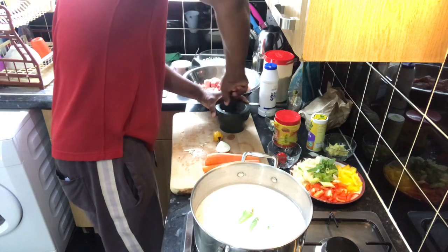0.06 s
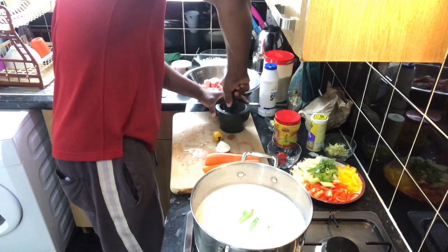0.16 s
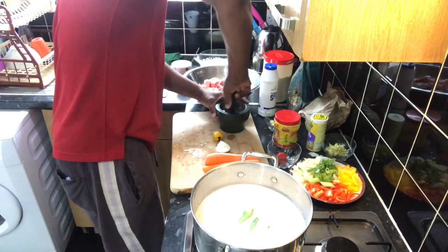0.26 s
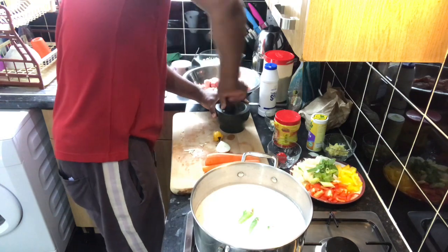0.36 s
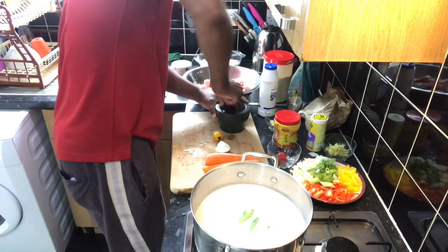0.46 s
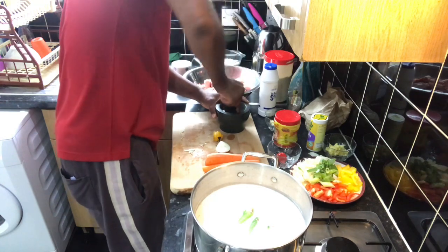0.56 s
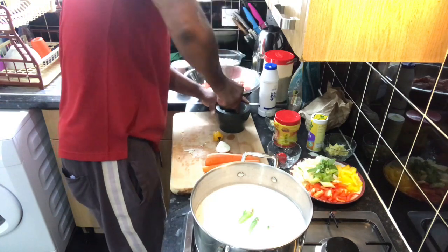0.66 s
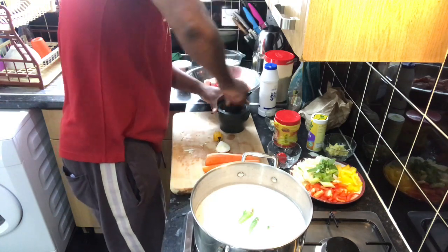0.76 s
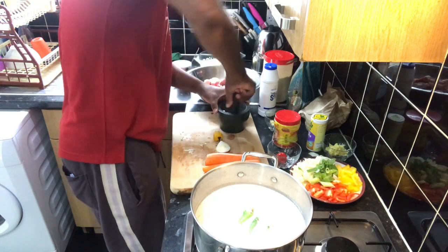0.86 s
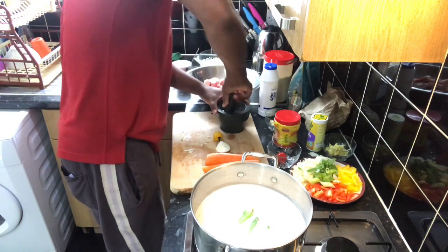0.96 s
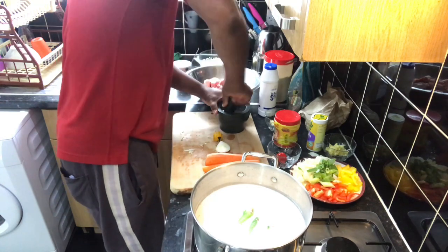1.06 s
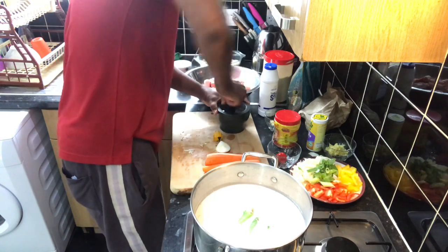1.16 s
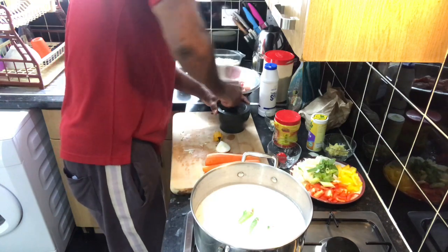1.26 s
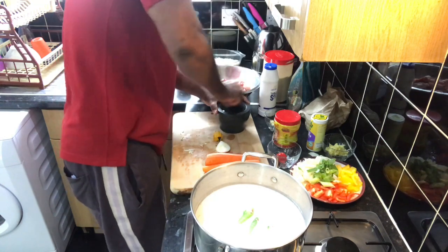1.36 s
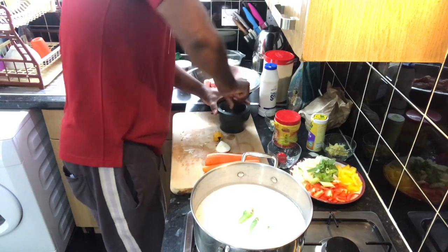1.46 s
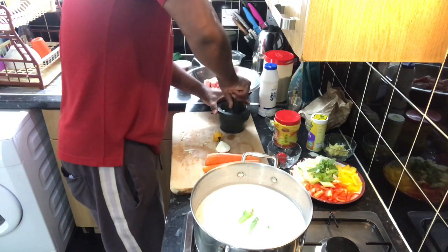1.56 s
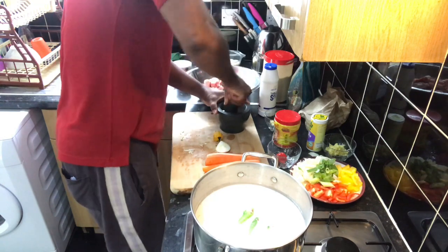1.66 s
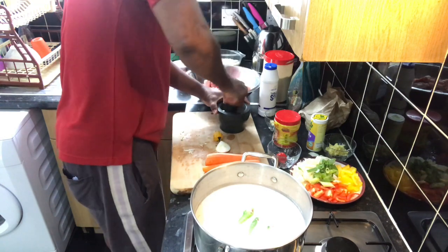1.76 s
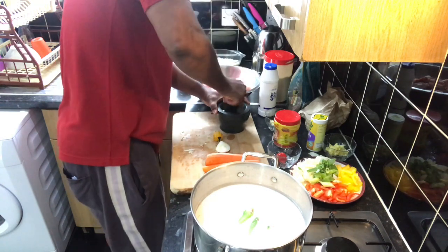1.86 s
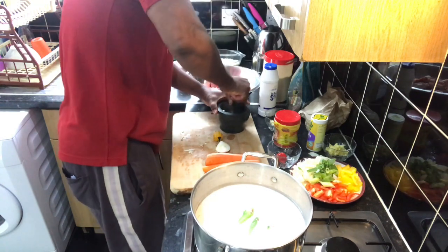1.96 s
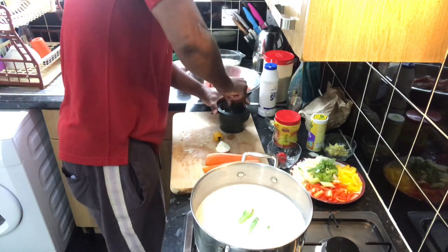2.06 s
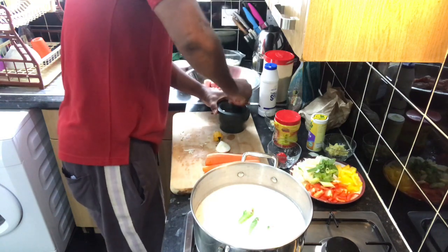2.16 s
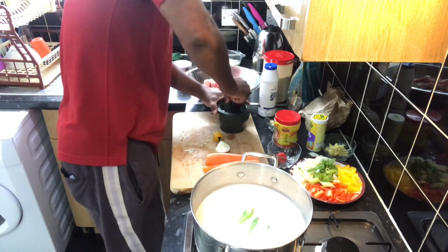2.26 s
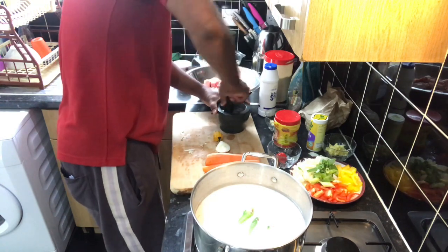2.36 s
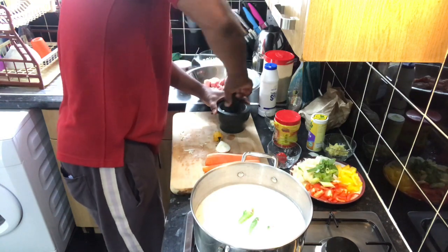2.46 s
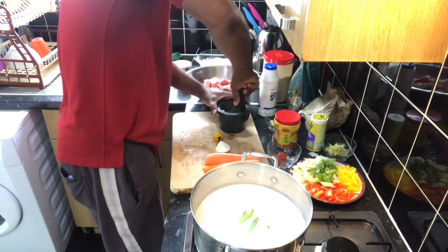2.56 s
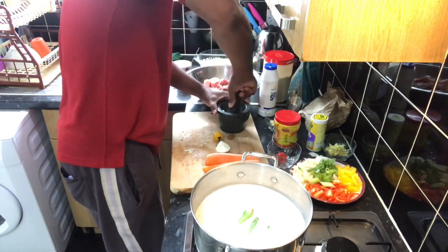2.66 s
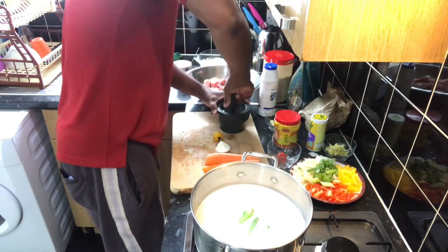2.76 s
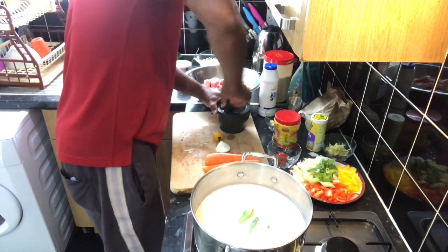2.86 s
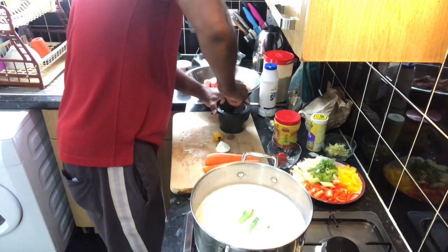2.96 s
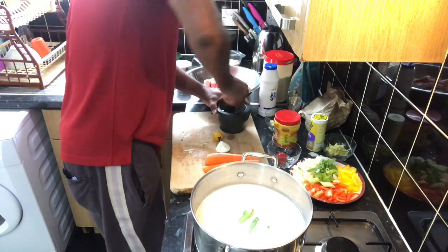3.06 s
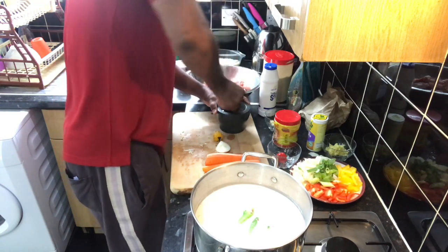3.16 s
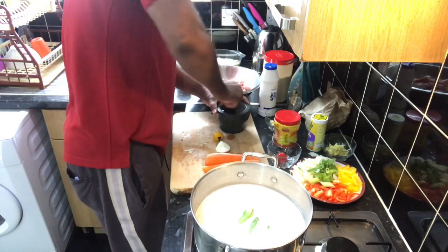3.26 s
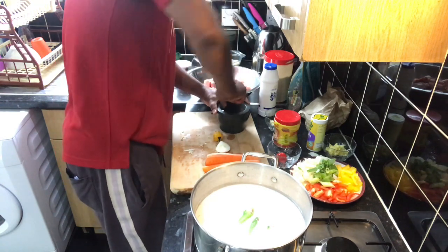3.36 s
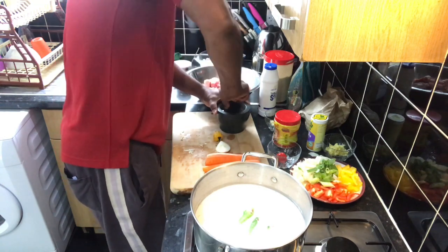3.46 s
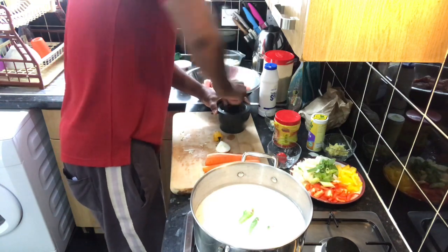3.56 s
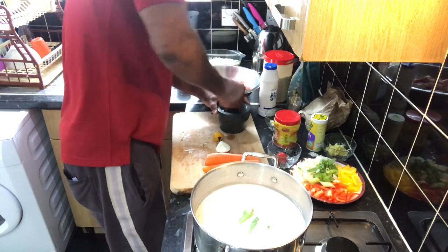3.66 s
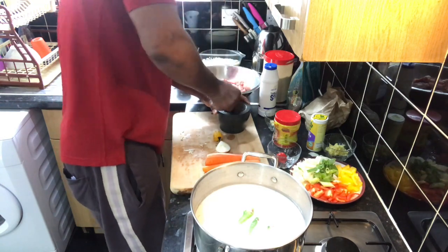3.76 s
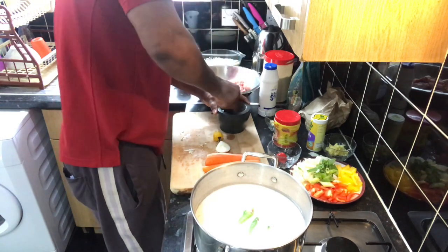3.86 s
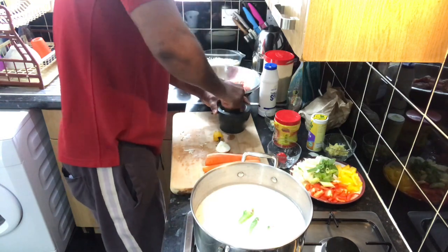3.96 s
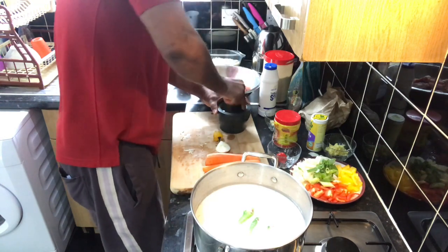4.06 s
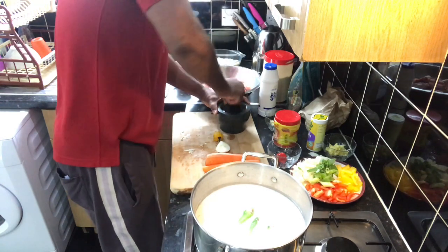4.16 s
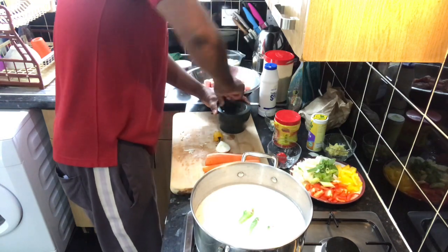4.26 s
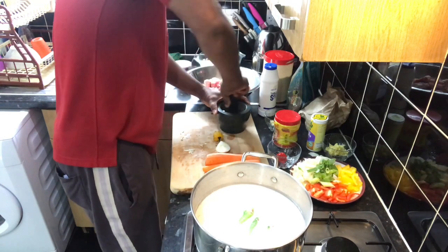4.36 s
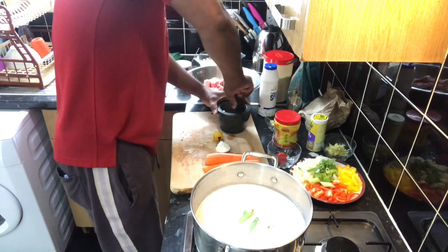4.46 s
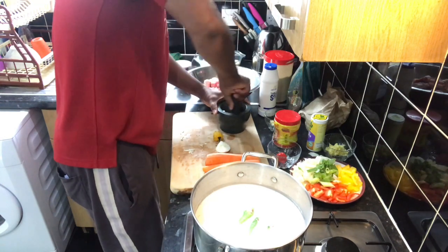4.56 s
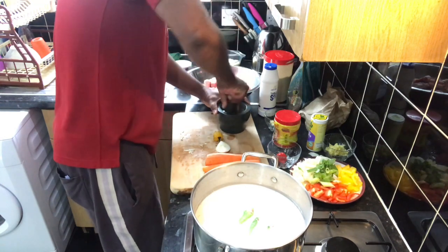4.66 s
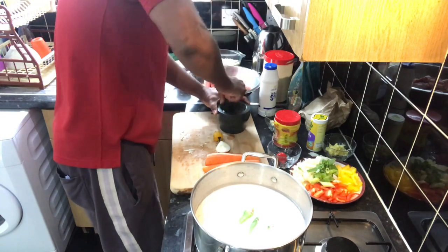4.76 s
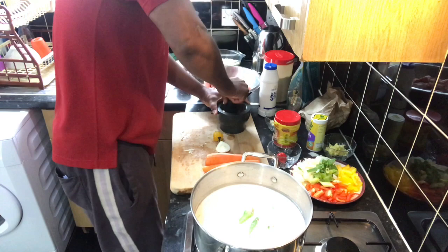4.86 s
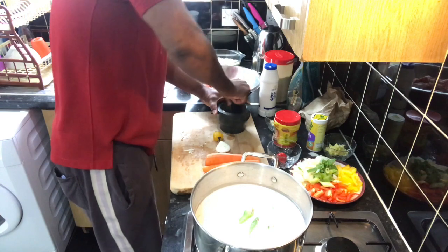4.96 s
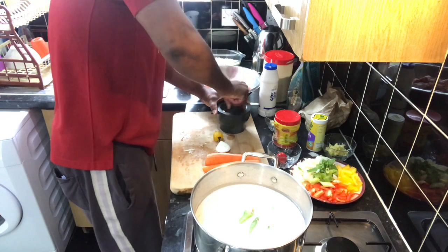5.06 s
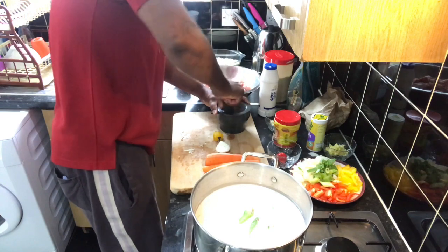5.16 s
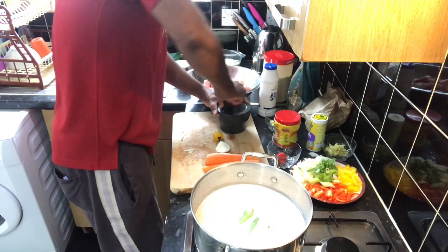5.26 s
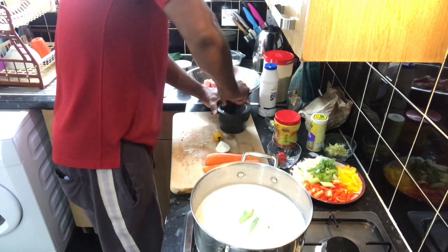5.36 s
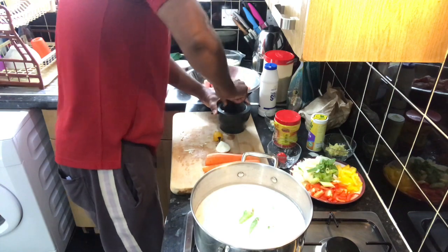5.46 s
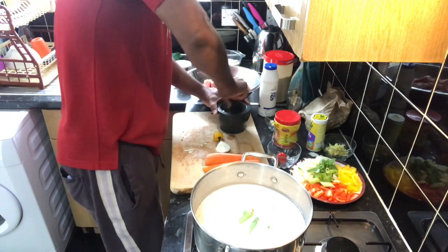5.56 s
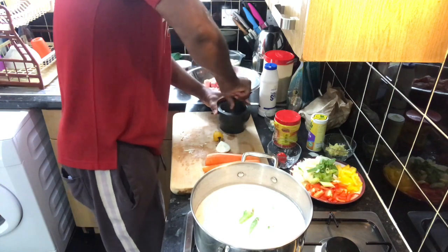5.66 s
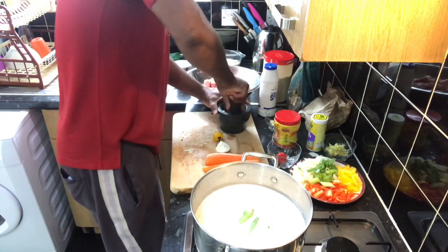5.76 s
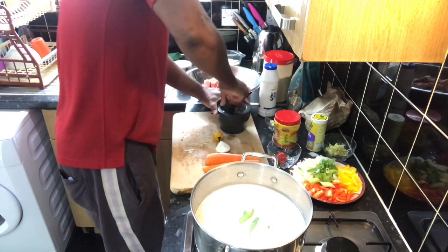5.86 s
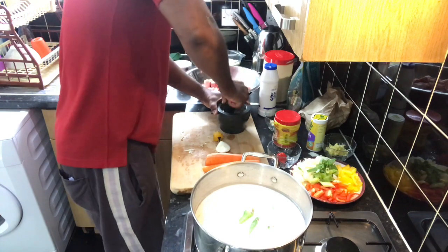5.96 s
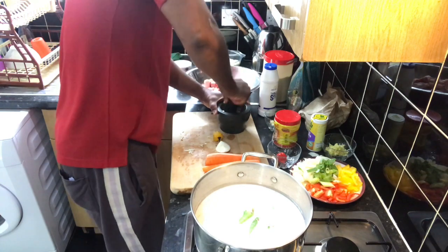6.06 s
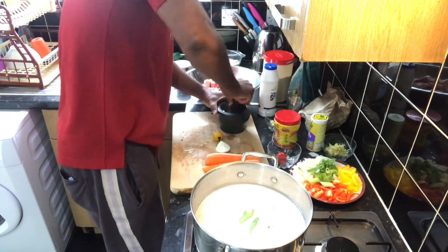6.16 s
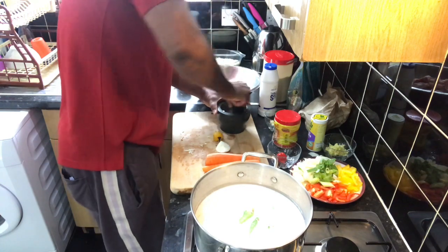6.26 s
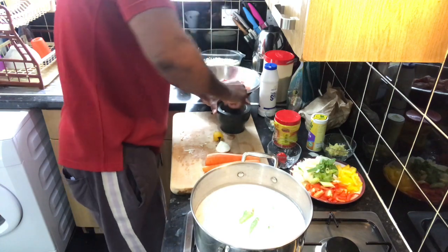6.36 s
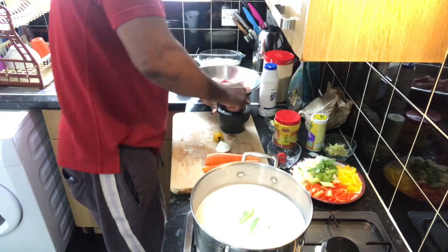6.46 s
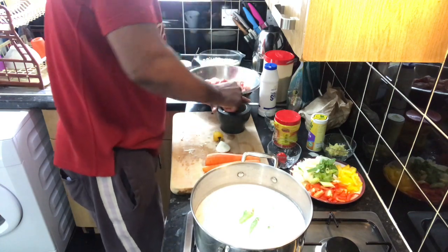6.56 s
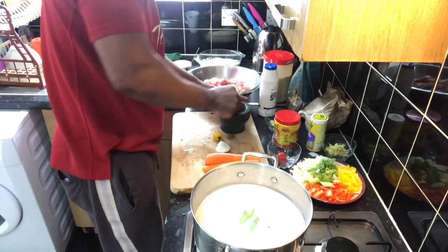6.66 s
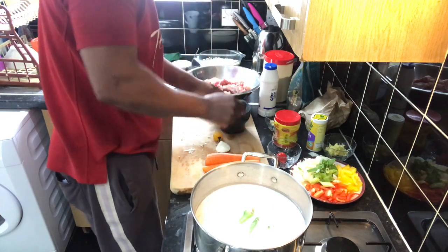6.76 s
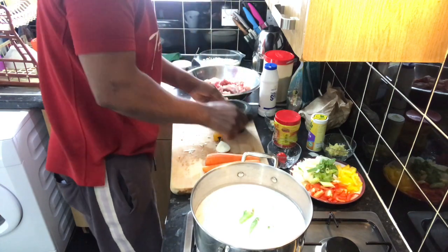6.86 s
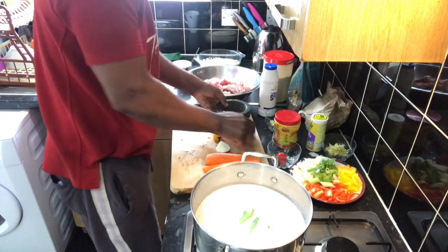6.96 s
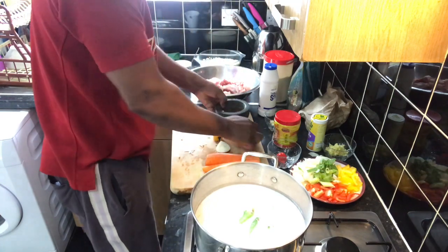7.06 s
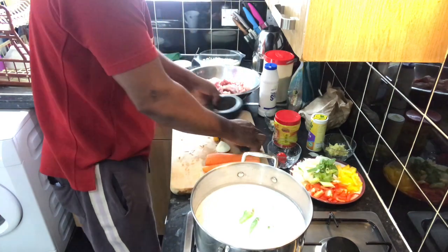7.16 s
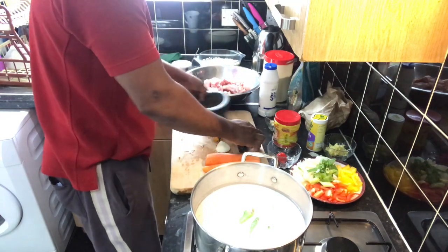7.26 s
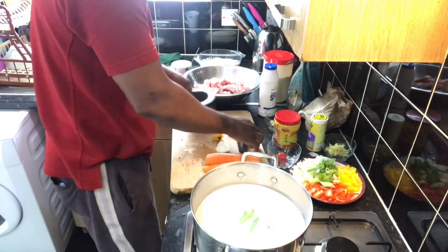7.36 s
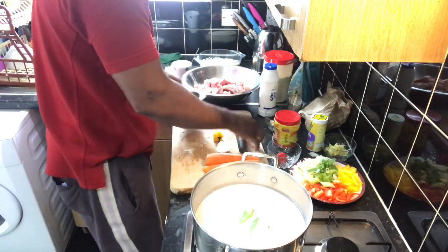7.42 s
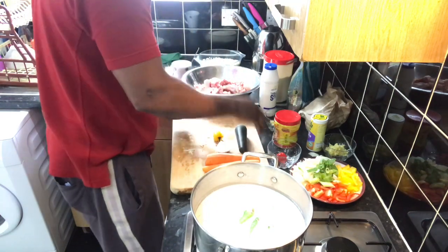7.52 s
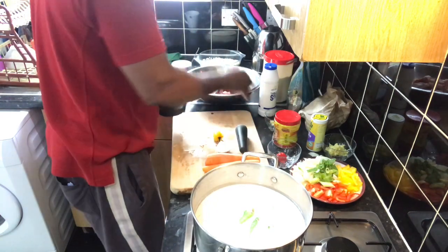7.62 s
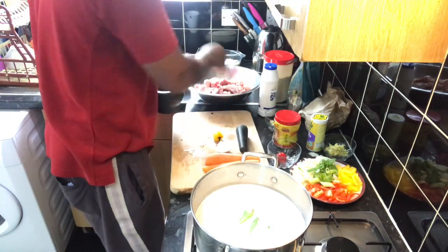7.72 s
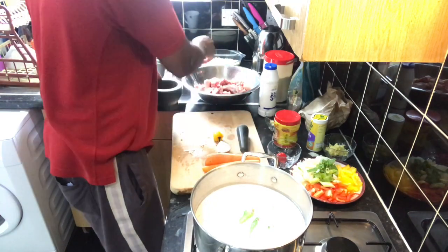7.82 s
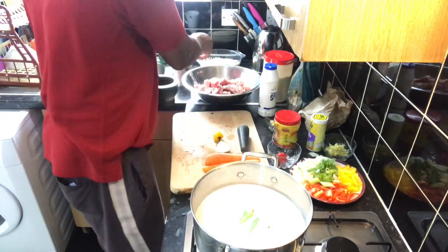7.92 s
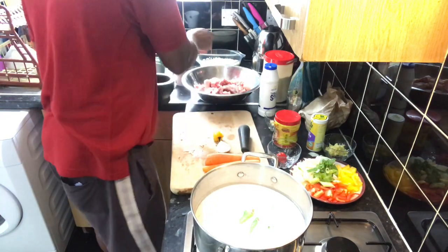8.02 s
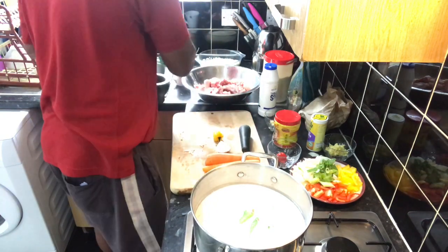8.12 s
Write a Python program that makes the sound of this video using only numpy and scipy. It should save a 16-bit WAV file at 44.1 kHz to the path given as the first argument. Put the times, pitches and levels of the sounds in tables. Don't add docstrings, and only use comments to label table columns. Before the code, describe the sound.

Close, irregular stony knocks and gritty scraping of a mortar and pestle on a board, ending with two woody clacks in a quiet kitchen.

```python
import sys
import numpy as np
from scipy import signal
from scipy.fft import rfft, irfft
from scipy.io import wavfile
from scipy.ndimage import uniform_filter1d

SR = 44100
rng = np.random.default_rng(int(sys.argv[2]) if len(sys.argv) > 2 else 0)


def bounce(signal):
    frames = np.transpose(np.atleast_2d(signal))
    limited = np.clip(frames, -1, 1)
    pcm = np.round(limited * 32767).astype(np.int16)
    wavfile.write(sys.argv[1], SR, pcm)


def volts(x):
    e = np.asarray(x, float) / 20
    return 10 ** e


N = 361179


def in_time(rows):
    s, *columns = np.transpose(rows)
    return [np.interp(np.arange(N) / SR, s, column) for column in columns]


def at_hz(points, hz):
    table_hz, values = np.transpose(points)
    return np.interp(np.log(hz), np.log(table_hz), values)


def rms_one(x):
    return x / np.sqrt(np.mean(x ** 2) + 1e-20)


def coloured(x, spectrum):
    hz = np.arange(len(x) // 2 + 1) * SR / len(x) + 1e-3
    inside = (hz > spectrum[0][0]) & (hz < spectrum[-1][0])
    return irfft(rfft(x) * volts(at_hz(spectrum, hz)) * inside, len(x))


def evened(x, width_hz):
    spectrum = rfft(x)
    smooth = uniform_filter1d(np.abs(spectrum) ** 2, max(round(width_hz * len(x) / SR), 1))
    return irfft(spectrum / np.sqrt(smooth + 1e-12), len(x))


def steadied(x, span_s):
    return rms_one(x / np.sqrt(uniform_filter1d(x ** 2, round(span_s * SR)) + .25))


def dull(x, cut_hz):
    return signal.sosfilt(signal.butter(4, cut_hz, fs=SR, output="sos"), x)


def drift(rate):
    points = rng.standard_normal(4000)
    return np.interp(np.arange(N) / SR * rate, np.arange(len(points)), points) * np.sqrt(3 / 2)


def ring(force, hz, t60):
    r, w = volts(-60 / (t60 * SR)), 2 * np.pi * hz / SR
    return signal.lfilter([0, np.sin(w)], [1, -2 * r * np.cos(w), r * r], force + 1e-18)


def strike(times, level_db, contact_s, modes, colour_db=None):
    spot_db = 1.5
    t = np.arange(SR // 8) / SR
    luck = rng.standard_normal((len(times), len(modes)))
    rough = rng.standard_normal((len(times), len(t)))
    done = np.minimum(t / np.clip(contact_s, 3e-4, .12)[:, None], 1)
    push = rough * done ** .6 * (1 - done) ** .6
    push = push / np.sqrt(np.sum(push ** 2, axis=1, keepdims=True))
    power = np.abs(rfft(push)) ** 2
    bins = np.arange(len(t) // 2 + 1) * SR / len(t)
    out = np.zeros(N)
    for k, (hz, mode_db, t60) in enumerate(modes):
        reach = 1 / (1 + ((bins - hz) * 2 * np.pi * t60 / np.log(1000)) ** 2)
        share = power @ reach / reach.sum()
        own_db = spot_db * luck[:, k] + (colour_db(hz) if colour_db else 0)
        gains = volts(level_db + mode_db + own_db) / np.sqrt(.93 * share + .07)
        force = np.zeros(N + len(t))
        for s, gain, shape in zip(times, gains, push):
            start = round(s * SR)
            force[start:start + len(t)] += gain * shape
        out += (-1) ** k * ring(force[:N], hz, t60)
    return out


def grit(per_s, size_db):
    sizes = volts(size_db * np.minimum(rng.exponential(1, N), 4)) * rng.choice([-1, 1], N)
    return rms_one(sizes * (rng.random(N) < per_s / SR))


def rubbed(modes, per_s, damping):
    force, out = grit(per_s, size_db=0.5), 0
    for k, (hz, db, t60) in enumerate(modes):
        out = out + volts(db) * (-1) ** k * ring(force, hz, t60 * damping)
    return rms_one(out)


# (frequency [Hz], level [dB per Hz])
ROOM_TONE = [(18, -25.5), (30, 6), (59, -16), (188, -3.5), (716, -8.5), (1610, -14.5), (1750, -12),
             (2390, -16.5), (3190, -22.5), (3540, -16), (5540, -27), (6650, -23.5), (10400, -43.5),
             (11800, -27), (15800, -52)]
ROOM_TONE_DB = -61.5
# (frequency [Hz], width [Hz], level [dB])
WHINES = [(3240, 72, -3), (5050, 170, -5), (6510, 68, -6.5), (8700, 220, -12), (12000, 150, -17)]


def hum():
    white, bands = rng.standard_normal(N), 0
    for hz, width, db in WHINES:
        t60 = np.log(1000) / np.pi / width
        bands = bands + volts(db) * rms_one(ring(white, hz, t60)) * np.sqrt(width)
    floor = rms_one(coloured(rng.standard_normal(N), ROOM_TONE)) + volts(-11.5) * rms_one(bands)
    return volts(ROOM_TONE_DB + .5 * drift(9.8)) * floor


# (frequency [Hz], t60 [s])
TILES_T60 = [(200, .24), (1000, .21), (4000, .21), (12000, .18)]


def kitchen(x):
    t = np.arange(SR // 2) / SR
    white, tail = rng.standard_normal(len(t)), 0
    for _ in range(6):
        cells = signal.stft(white, nperseg=2048, noverlap=1536)[2]
        flat = cells / (np.abs(cells) + 1e-12)
        white = signal.istft(flat, nperseg=2048, noverlap=1536)[1][:len(t)]
    for low in 90 * 2. ** np.arange(8):
        octave = signal.butter(2, [low, min(2 * low, .45 * SR)], "band", fs=SR, output="sos")
        tail = tail + signal.sosfilt(octave, white) * volts(-60 * t / at_hz(TILES_T60, 1.4 * low))
    build_up = 1 - np.exp(-np.maximum(t - .001, 0) / .002)
    tail = evened(tail, 35) * build_up * (t < .42)
    return signal.fftconvolve(x, tail / np.sqrt(np.sum(tail ** 2)))[:N]


# (time [s], level [dB], contact [s])
LAID_ENDS = [
    (7.0168, -7, 0.008),
    (7.157, 1.5, 0.0035),
]
# (frequency [Hz], level [dB], t60 [s])
POT_MODES = [(1105, -2, .6), (1240, -5, .5), (2010, -4, .6)]


def pot():
    s, level_db, contact_s = LAID_ENDS[-1]
    return strike([s], np.array([level_db - 49]), np.array([contact_s]), POT_MODES)


# (time [s], pressure [dB], sliding speed [dB])
WRIST = [(0.0, -50.5, -53.5), (0.15, -57.5, -68.5), (0.88, -62, -72), (1.07, -53.5, -65),
         (2.32, -54.5, -71), (2.83, -52.5, -57.5), (3.04, -58.5, -74), (3.59, -59, -63),
         (4.02, -54.5, -63.5), (4.48, -50.5, -68), (4.64, -48, -49), (4.85, -50, -60), (5.46, -54.5, -68),
         (5.65, -51, -54.5), (5.81, -46, -49), (6.04, -51.5, -63), (6.32, -52.5, -67.5),
         (7.0, -70.5, -81.5)]
# (time [s], sway level [dB], knock-through level [dB])
ARM_THRUSTS = [(0.08, -42.5, -43.5), (0.239, -44.5, -73), (0.477, -43, -31.5), (0.92, -47, -38.5),
               (1.091, -44, -40), (1.248, -56, -40), (1.436, -58, -33), (1.68, -66, -47.5), (2.0, -49, -34),
               (2.11, -43, -39.5), (2.24, -43.5, -46), (2.59, -47, -37.5), (2.83, -40.5, -40.5),
               (2.999, -38.5, -42.5), (3.311, -46, -41), (3.6, -57, -65), (3.84, -47.5, -43.5),
               (4.06, -44, -42), (4.441, -46, -41.5), (4.75, -48, -58), (4.969, -47, -36.5),
               (5.2, -43, -44), (5.408, -42, -43), (5.7, -55, -65), (6.02, -54, -39), (6.18, -56, -44.5),
               (6.52, -59, -35.5), (6.71, -52, -43), (7.061, -36, -42), (7.18, -45, -54)]
# (frequency [Hz], level [dB], t60 [s])
THUD_MODES = [(330.2, -2.5, 0.032), (359.5, -3, 0.055), (514, 8, 0.01), (573, 2, 0.055), (598, -3.5, 0.034)]


def worktop():
    lean_db_per_s, ease_db_per_s = 297.5, 123.5
    t = np.arange(N) / SR
    pressure_db = in_time(WRIST)[0] - ease_db_per_s * np.maximum(t - WRIST[-1][0], 0)
    sway_db = np.maximum(pressure_db - 3, -63.5)
    through_db = np.maximum(pressure_db - 2, -73)
    for s, lean_db, jolt_db in ARM_THRUSTS:
        loss = np.maximum(lean_db_per_s * (s - t), ease_db_per_s * (t - s))
        sway_db = np.maximum(sway_db, lean_db - loss)
        through_db = np.maximum(through_db, jolt_db - 1.24 * loss)
    sway = steadied(rubbed([(45, -1, .2), (60, 0.5, .15)], 900, damping=0.8), .12)
    through = steadied(rubbed([(114.6, 0, .25)], 900, damping=0.72), .06)
    thrum_modes = [(170.0, -4.5, 0.056), (223.8, -10.0, 0.24)] + THUD_MODES
    thrum = steadied(rubbed(thrum_modes, 220, damping=0.95), 0.37)
    usual_db, growth = -53.5, 1.8
    thrum_gain = volts(usual_db + growth * (pressure_db - usual_db) - 3) + volts(through_db - 13)
    flutter = volts(5.5 * drift(18))
    return volts(sway_db) * sway + volts(through_db) * through + thrum_gain * flutter * thrum


def hand_stops(s):
    return np.maximum(np.arange(N) / SR - s - 0.054, 0)


# (frequency [Hz], level [dB], t60 [s])
CLOSE_NOTE = [(620, 0, .4)]


def held_note():
    s, level_db, contact_s = LAID_ENDS[0]
    note = strike([s], np.array([level_db - 8.5]), np.array([contact_s]), CLOSE_NOTE)
    return note * volts(-60 * hand_stops(s) / .035)


# (frequency [Hz], level [dB], t60 [s])
FIRST_END_MODES = [(307, -14, .06), (540, -11, .03), (945, -2, .025), (1090, -6, .03), (1370, -8, .035),
                   (1570, -10, .03), (1920, -15, .03), (2230, -14, .03), (2590, -13, .035),
                   (2720, -14, .015), (2930, -14, .025), (3250, -19, .03), (3900, -19, .03),
                   (4400, -20, .02)]
# (frequency [Hz], level [dB], t60 [s])
SECOND_END_MODES = [(620, -13, .04), (950, -9, .03), (1110, 1, .05), (1190, -2, .035), (1250, -2, .03),
                    (1350, 1.5, .05), (1518, -5, .03), (1720, -5, .025), (2010, -13, .012),
                    (2310, -10, .012), (2700, -12, .01), (3340, -8, .015), (3600, -11, .012),
                    (4400, -18, .007)]
# (frequency [Hz], level [dB per Hz])
FIRST_END_CRACK = [(59, -49), (100, -21.5), (452, -16.5), (620, -11), (733, -18), (942, -14), (2630, -24),
                   (15000, -74)]
# (frequency [Hz], level [dB per Hz])
SECOND_END_CRACK = [(59, -60.5), (100, -22.5), (352, -14.5), (607, -11), (1020, -13.5), (1320, -4.5),
                    (3460, -20), (15000, -72.5)]


def laid_down():
    out, t = np.zeros(N), np.arange(SR // 4) / SR
    ends = [(FIRST_END_MODES, FIRST_END_CRACK), (SECOND_END_MODES, SECOND_END_CRACK)]
    for (s, level_db, contact_s), (modes, colour) in zip(LAID_ENDS, ends):
        shape = volts(-60 * t / 0.1) * (1 - np.exp(-t / contact_s))
        snap = evened(rng.standard_normal(len(t)) * shape, 150)
        crack = rms_one(coloured(snap, colour)) * np.minimum(t / .001, 1) * (t < .2)
        start = round(s * SR)
        out[start:start + len(t)] += volts(level_db - 24.0) * crack
        rung = strike([s], np.array([level_db - 3.5]), np.array([contact_s]), modes)
        out += dull(rung, cut_hz=11000) * volts(-60 * hand_stops(s) / .03)
    return out


# (time [s], peak level [dB], pitch [Hz])
ROCKS = [(0.045, -57, 200), (0.148, -37, 207), (0.372, -32.5, 226), (1.067, -52, 186), (1.159, -41, 159),
         (1.372, -34, 307), (1.786, -57, 222), (1.961, -35, 203), (2.057, -34, 148), (2.32, -35.5, 322),
         (2.541, -47, 156), (2.605, -29.5, 230), (2.791, -34.5, 193), (2.92, -43.5, 150),
         (3.287, -31.5, 143), (3.41, -56, 143), (3.695, -43.5, 225), (3.802, -42, 185), (3.996, -35, 316),
         (4.122, -46, 228), (4.162, -43, 196), (4.455, -27, 246), (4.589, -29.5, 243), (4.717, -37, 148),
         (4.784, -40, 186), (4.834, -43, 205), (4.932, -33.5, 198), (5.094, -40, 176), (5.333, -37, 323),
         (5.584, -39.5, 204), (5.756, -32, 303), (5.973, -34.5, 179), (6.144, -53, 172),
         (6.206, -46.5, 281), (6.328, -35.5, 170), (6.471, -33, 157)]


def thumps():
    rise_s, t60_s = 0.0075, 0.085
    out, t = np.zeros(N + SR), np.arange(SR // 4) / SR
    waver = rng.standard_normal((len(ROCKS), 12))
    shape = (1 - np.exp(-t / rise_s)) * volts(-60 * t / t60_s)
    shape = shape / shape.max()
    for (s, level_db, hz), luck in zip(ROCKS, waver):
        bend = 1 + 0.13 * np.interp(t, np.linspace(0, t[-1], len(luck)), luck)
        note = np.sin(2 * np.pi * hz * np.cumsum(bend) / SR)
        start = round((s - .006) * SR)
        out[start:start + len(t)] += volts(level_db - 5) * shape * note
    return out[:N]


# (time [s], level [dB], length [s])
SWEEPS = [(0.095, -47, 0.14), (0.554, -54, 0.064), (1.352, -44.5, 0.052), (1.467, -47, 0.1),
          (1.873, -50, 0.038), (1.963, -33, 0.0057), (2.243, -41.5, 0.17), (2.495, -50.5, 0.023),
          (2.569, -49, 0.03), (2.612, -42, 0.043), (2.707, -41.5, 0.036), (2.767, -36.5, 0.042),
          (2.951, -46.5, 0.076), (3.288, -47, 0.018), (3.507, -42.5, 0.084), (3.915, -48.5, 0.022),
          (4.12, -47, 0.026), (4.154, -45, 0.045), (4.202, -39.5, 0.12), (4.424, -42.5, 0.13),
          (4.605, -40, 0.048), (5.04, -45, 0.082), (5.145, -42, 0.09), (5.558, -38.5, 0.033),
          (5.614, -41.5, 0.027), (5.758, -40, 0.045), (6.052, -43.5, 0.027), (6.058, -46, 0.14),
          (6.163, -46, 0.11), (6.472, -36, 0.011)]
# (time [s], board level [dB], puff level [dB], contact [s])
BERRY_CRUSHES = [(0.0155, -33.5, -65, 0.011), (0.371, -34, -58, 0.045), (0.4, -18.5, -49, 0.021),
                 (0.417, -13, -50, 0.017), (0.44, -19, -49, 0.012), (1.054, -34, -46.5, 0.035),
                 (1.125, -35, -62, 0.022), (1.22, -34.5, -44, 0.017), (1.63, -9, -41.5, 0.022),
                 (1.647, -9, -47, 0.022), (1.661, -22.5, -50, 0.011), (1.783, -27.5, -46, 0.013),
                 (2.175, -11.5, -37, 0.029), (2.851, -36.5, -56, 0.037), (2.903, -17, -40, 0.034),
                 (3.307, -24.5, -54, 0.014), (3.797, -39, -49, 0.036), (3.994, -22, -50, 0.029),
                 (4.22, -26.5, -46, 0.026), (4.444, -38, -38, 0.022), (4.581, -63, -41.5, 0.032),
                 (4.712, -33, -53, 0.0086), (4.718, -26.5, -34.5, 0.034), (4.778, -37, -37, 0.0098),
                 (4.829, -39, -42, 0.023), (4.919, -35, -41, 0.024), (5.314, -11, -39.5, 0.026),
                 (5.448, -39, -38.5, 0.0097), (5.813, -19.5, -43, 0.022), (5.836, -15.5, -50, 0.061),
                 (5.853, -20, -48, 0.024), (5.873, -12, -35.5, 0.015), (5.892, -21.5, -50, 0.034),
                 (5.956, -14.5, -37, 0.027)]
# (frequency [Hz], level [dB per Hz])
POWDER_HISS = [(710, -8.5), (1200, -9), (2780, -7), (3200, -16), (3640, -8), (4770, -10.5), (6600, -7.5),
               (7590, -12.5), (13700, -18.5), (15800, -21.5)]
# (frequency [Hz], level [dB], t60 [s])
BOARD_MODES = [(720, -6, .025), (775, -4, .025), (865, -1, 0.035), (935, 0, 0.025), (1030, 2, .025),
               (1095, 4, 0.022), (1150, 3, 0.025), (1260, 0, .02), (1350, 2, 0.025), (1454, 0, 0.019),
               (1600, -1, 0.02), (1700, -1, .02)]
# (frequency [Hz], level [dB], t60 [s])
STONE_MODES = [(1600, -6, .01), (1800, -6, .008), (1990, -8, .008), (2200, -7, .008), (2430, -3, .01),
               (2600, -3, .01), (2780, -5, .01), (2980, -11, .008), (3250, -13, .007), (3570, -12, .008),
               (3850, -13, .006), (4150, -14, .007), (4480, -17, .006), (4850, -17, .006)]


def powder_swells():
    puffs = [(s - .011, puff_db, 0.041) for s, _, puff_db, _ in BERRY_CRUSHES]
    swells = np.zeros(N)
    for s, swell_db, length in SWEEPS + puffs:
        swell = np.hanning(round(1.25 * length * SR)) ** 2
        start = round((s - .004) * SR)
        swells[start:start + len(swell)] += volts(2 * (swell_db - 10.0)) * swell
    return swells


def grinding():
    pressure_db, speed_db = in_time(WRIST)
    moving = np.clip((WRIST[-1][0] - np.arange(N) / SR) / .02, 0, 1)
    judder = drift(38)
    swells = powder_swells()
    drag = np.sqrt(volts(2 * (pressure_db - 7.5)) + volts(2 * -3) * swells) * volts(5.5 * judder)
    rub = drag * dull(rubbed(BOARD_MODES + STONE_MODES, 3400, damping=0.93), cut_hz=1120)
    power = volts(2 * (speed_db - 3.0 + 0.62 * judder)) + swells
    hiss = np.sqrt(power) * rms_one(coloured(grit(14000, size_db=4.5), POWDER_HISS))
    return moving * rub, moving * hiss


# (time [s], level [dB], contact [s])
CHATTERS = [(0.397, -58, 0.047), (0.427, -59, 0.031), (0.873, -72.5, 0.031), (1.3854, -64, 0.054),
            (1.9609, -56, 0.016), (2.5954, -58, 0.024), (2.6494, -67, 0.0143), (3.6676, -66, 0.046),
            (4.032, -56, 0.0082), (5.3178, -58, 0.024), (7.1564, -52, 0.022)]
# (frequency [Hz], level [dB], t60 [s])
PESTLE_MODES = [(8900, -4, .02), (9070, 0, .03), (9200, -5, .02), (13300, -8, .02)]


def pestle_sings():
    s, sing_db, contact_s = np.transpose(CHATTERS)
    return strike(s, sing_db + 10.0, contact_s, PESTLE_MODES)


# (time [s], board level [dB], then re board: thud [dB], crack [dB], bowl ring [dB])
STONE_KNOCKS = [(0.876, -9, -12.5, 1, -18), (0.885, -16, -17, -11, -18), (0.898, -19, -9, -5, -11.5),
                (1.366, -31, -2.5, -3.5, -30), (1.383, -22, -16.5, -10.5, -28.5),
                (1.961, -18, -8.5, -6, -24), (2.051, -21.5, -9, -13, -47), (2.572, -34.5, -29, 11.5, -16.5),
                (3.287, -35, -7, -22.5, -35), (3.98, -21, -8.5, -26, -61.5), (4.024, -13.5, -6, 1.5, -22.5),
                (5.108, -27.5, -16, -3, -31), (5.141, -34.5, 3, -4.5, -36), (6.466, -17, -10, 4.5, -26),
                (6.475, -15, -6.5, -16, -30.5), (6.676, -25.5, 0.5, -3.5, -34),
                (7.769, -72.5, -12, 11.5, -36.5)]
# (time [s], board level [dB], re board: crack [dB], bowl ring [dB], contact [s])
STONE_SKIDS = [(1.153, -23.5, -33, -51, 0.0073), (1.404, -25.5, -18, -29, 0.026),
               (1.431, -28.5, -15, -38, 0.022), (1.467, -30.5, -23, -33, 0.074),
               (1.963, -20.5, -2, -31, 0.027), (2.172, -38, -11, -19, 0.011), (3.291, -52, -9, -20, 0.011),
               (2.594, -22.5, -6.5, -26, 0.028), (2.615, -29.5, -9, -26, 0.048),
               (2.658, -33.5, -11, -23, 0.094), (2.712, -35.5, -3, -14, 0.012),
               (3.661, -29.5, -11, -26.5, 0.046), (3.696, -35, -9, -26, 0.02),
               (4.197, -23.5, -21, -41, 0.011), (5.119, -28, -13, -26, 0.04),
               (5.162, -24.5, -10.5, -22, 0.035), (5.785, -24.5, -19, -35, 0.0054)]


def bare_contacts():
    knock = np.insert(np.array(STONE_KNOCKS), 5, .00045, axis=1)
    skid = np.insert(np.array(STONE_SKIDS), 2, -8.5, axis=1)
    s, *rest = np.vstack([knock, skid]).T
    return s - .0006, *rest


# (frequency [Hz], level [dB], t60 [s])
BOWL_MODES = [(5200, -16, .015), (5320, -6, .03), (5392, -7, .038), (5470, -12, .02), (5590, -17, .015),
              (5850, -19, .012)]
# (frequency [Hz], level [dB], t60 [s])
BOWL_TOP_MODES = [(11050, -4, .03), (11150, 0, .04), (13240, -3, .03), (13900, -8, .025)]


def bowl_rings():
    s, board_db, _, _, bowl_db, contact_s = bare_contacts()
    low = strike(s, board_db + bowl_db + 20.5, contact_s + 0.00386, BOWL_MODES)
    high = strike(s, board_db + bowl_db - 13.0, contact_s + 0.0084, BOWL_TOP_MODES)
    return low + high


# (time [s], favoured pitch [Hz], extra thud [dB])
MORTAR_FOOTING = [(0.016, 805, -3), (0.371, 970, 3), (0.401, 1190, -5), (0.417, 1140, 0), (0.437, 1300, 2),
                  (0.876, 950, 8), (1.055, 960, 4.0), (1.125, 1170, -11), (1.157, 1045, 1),
                  (1.22, 980, 0.5), (1.366, 1110, 1.5), (1.386, 955, 10.5), (1.406, 1030, -9),
                  (1.431, 1000, -5), (1.467, 880, 2), (1.631, 950, 1.5), (1.654, 930, 9.5), (1.784, 975, 6),
                  (1.962, 1090, 0.5), (2.05, 1150, 3.5), (2.177, 990, 1), (2.572, 1450, -2),
                  (2.595, 1080, -0.5), (2.616, 1180, 8), (2.658, 1000, 8), (2.851, 940, -1.5),
                  (2.904, 1170, 4), (3.29, 850, 10), (3.306, 820, -10), (3.662, 1370, -5), (3.696, 1380, 3),
                  (3.798, 1043, 0.5), (3.982, 1015, 2.5), (3.996, 1080, 9), (4.024, 1090, 2.5),
                  (4.203, 860, -16), (4.22, 890, -4), (4.444, 1050, 5.5), (4.715, 960, 5), (4.917, 970, 3),
                  (5.108, 1130, 8), (5.141, 1130, 3), (5.163, 1030, 9.5), (5.31, 946, 5), (5.449, 960, 3.5),
                  (5.789, 950, 10.5), (5.813, 930, 6.5), (5.835, 935, 7), (5.866, 1010, 5),
                  (5.953, 1110, 5.5), (6.466, 990, 3), (6.476, 950, 2.5), (6.676, 1060, -1)]


def knocks():
    bare_s, bare_db, bare_thud, bare_crack, _, bare_contact = bare_contacts()
    soft_s, soft_db, _, soft_contact = np.transpose(BERRY_CRUSHES)
    s = np.r_[bare_s, soft_s - 0.0067]
    contact_s = np.r_[bare_contact, soft_contact]
    foot_s, favoured_hz, extra_db = np.transpose(MORTAR_FOOTING)
    nearest = np.abs(s[:, None] + .004 - foot_s).argmin(axis=1)
    board_lag_s = .002
    favour = 14 * np.where(contact_s > board_lag_s, 3, 1)

    def footing_db(hz):
        return -np.minimum(favour * np.log2(hz / favoured_hz[nearest]) ** 2, 11)

    board_db = np.r_[bare_db, soft_db] - 0.5
    board = strike(s, board_db, np.maximum(contact_s, board_lag_s), BOARD_MODES, footing_db)
    soft_thud_db = -24 + 0.36 * soft_db
    thud_db = np.r_[bare_db + bare_thud, soft_thud_db] + extra_db[nearest]
    thud = strike(s + 0.002087, thud_db + 1.5, contact_s + 0.00176, THUD_MODES)
    crack_db = np.r_[bare_db + bare_crack, soft_db - 23]

    def hardness_db(hz):
        return np.clip(crack_db + 8.5, -25, 15) * max(np.log2(hz / 2900), 0)

    crack = strike(s, crack_db + 11.0, contact_s, STONE_MODES, hardness_db)
    thin = signal.butter(2, 260, "high", fs=SR, output="sos")
    return dull(signal.sosfilt(thin, board + thud), cut_hz=5600) + dull(crack, cut_hz=6800)


def scene():
    rub, hiss = grinding()
    stone = knocks() + bowl_rings() + pestle_sings()
    close, note = stone + rub + thumps() + laid_down(), held_note()
    echoes = volts(-4) * kitchen(close + volts(-5.0) * hiss + volts(-15.5) * note)
    return (close + note + hiss + echoes + worktop() + pot() + hum())[None]


def roll_off(x):
    return signal.sosfilt(signal.butter(12, 15850, fs=SR, output="sos"), x)


def record(dry):
    port = signal.sosfilt(signal.butter(5, 35, "high", fs=SR, output="sos"), dry)
    rounded = port / (1 + (port / .98) ** 4) ** .25
    return roll_off(rounded)


dry = scene()
out = record(dry)
bounce(out)
```